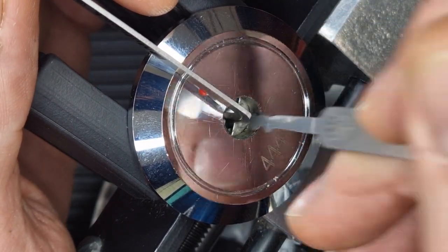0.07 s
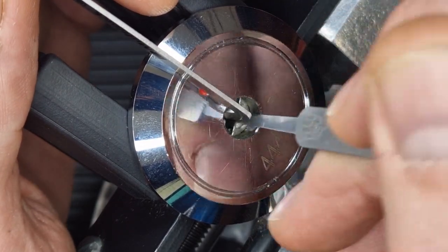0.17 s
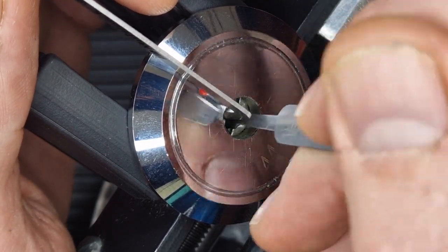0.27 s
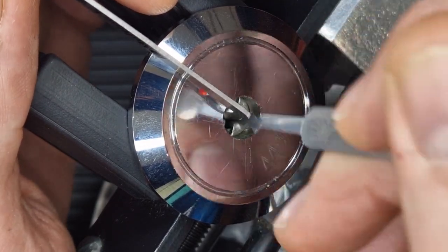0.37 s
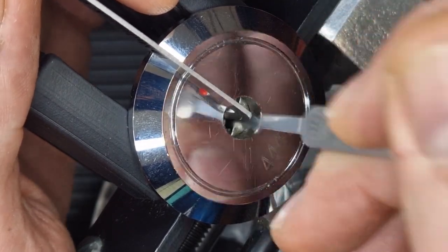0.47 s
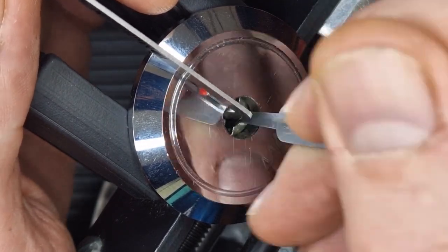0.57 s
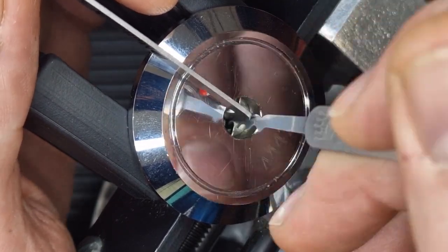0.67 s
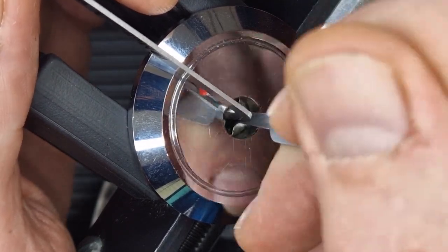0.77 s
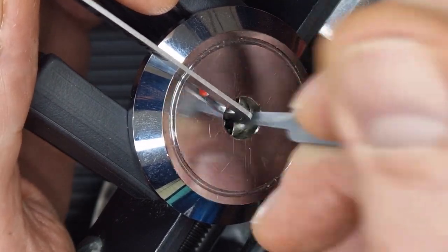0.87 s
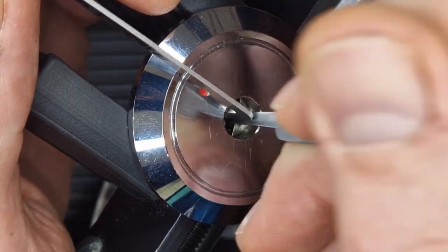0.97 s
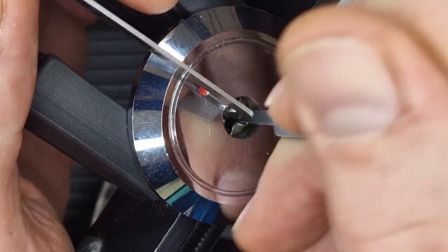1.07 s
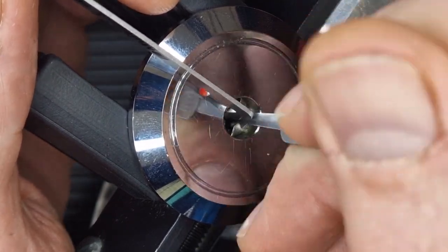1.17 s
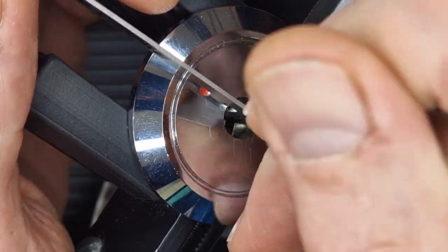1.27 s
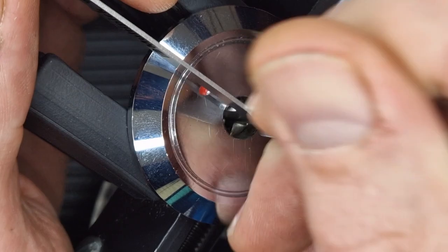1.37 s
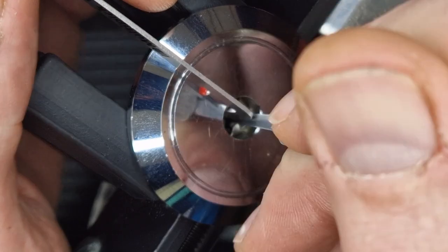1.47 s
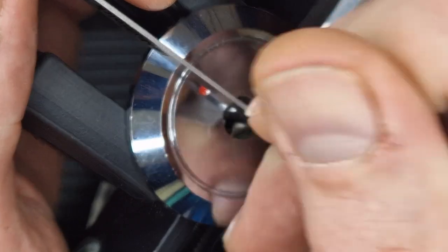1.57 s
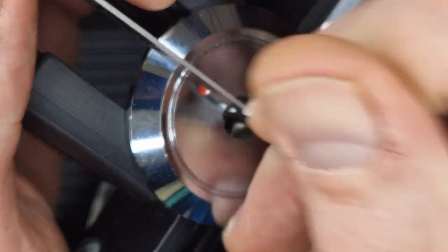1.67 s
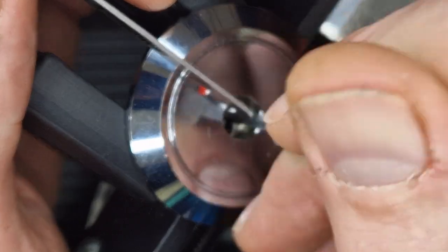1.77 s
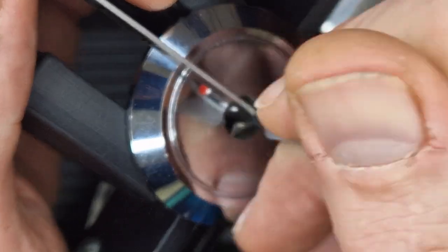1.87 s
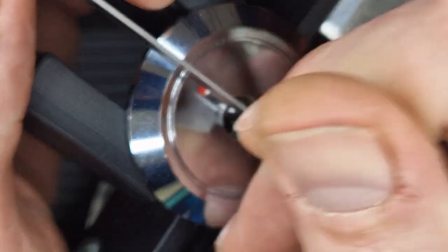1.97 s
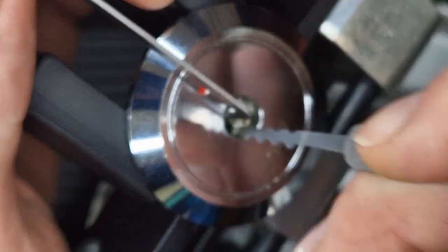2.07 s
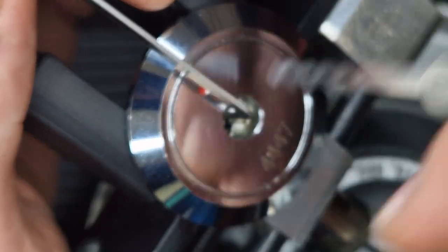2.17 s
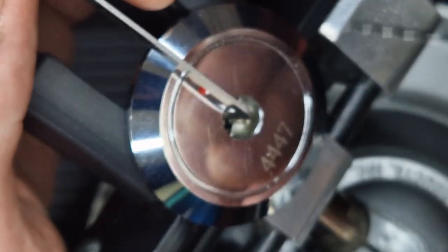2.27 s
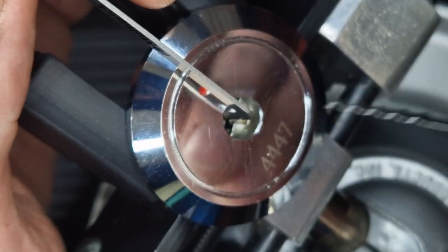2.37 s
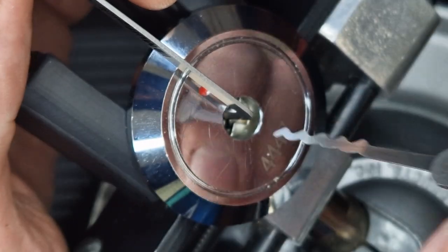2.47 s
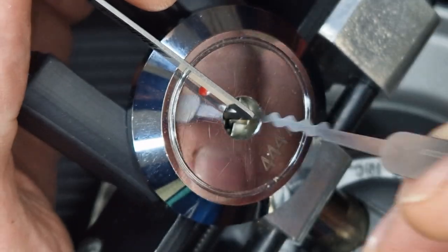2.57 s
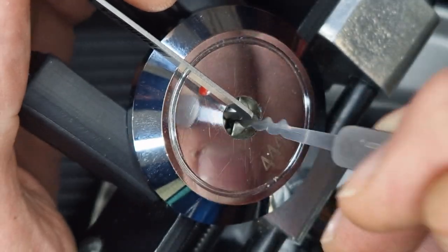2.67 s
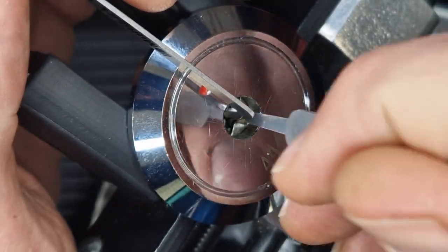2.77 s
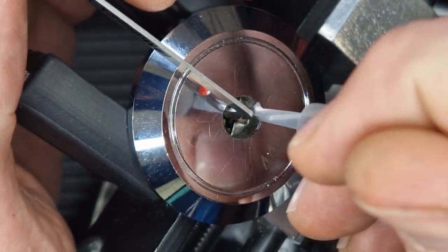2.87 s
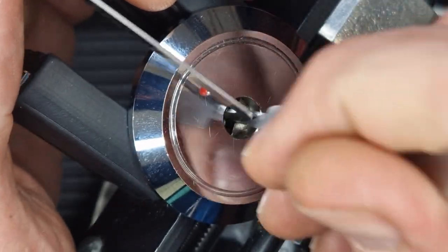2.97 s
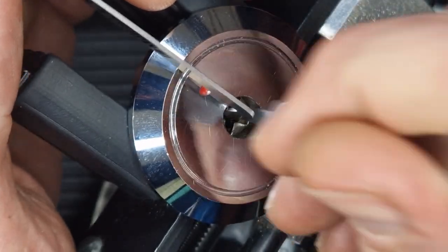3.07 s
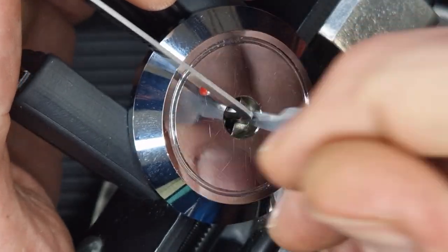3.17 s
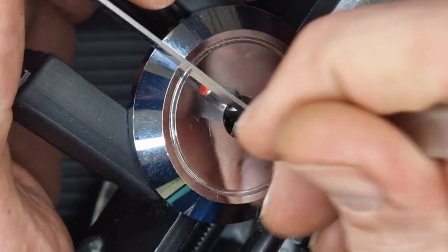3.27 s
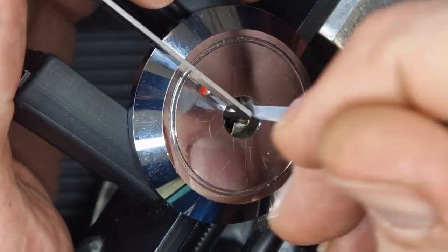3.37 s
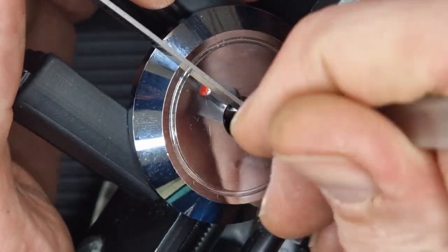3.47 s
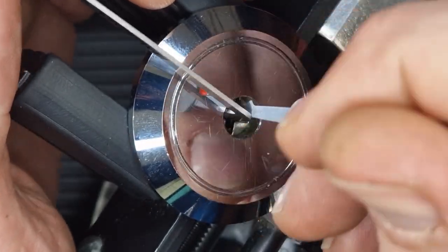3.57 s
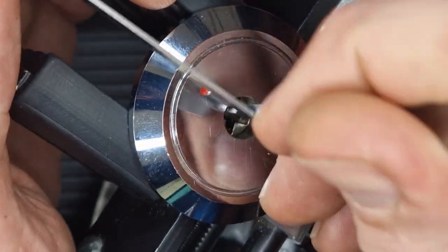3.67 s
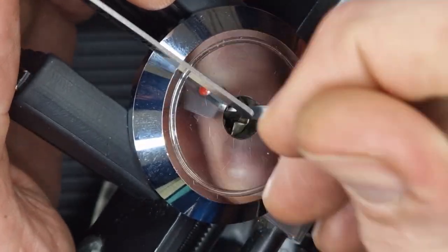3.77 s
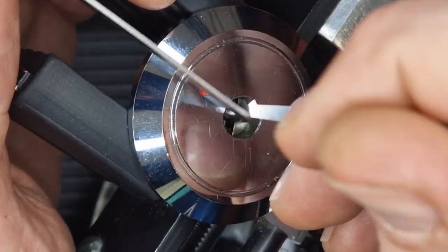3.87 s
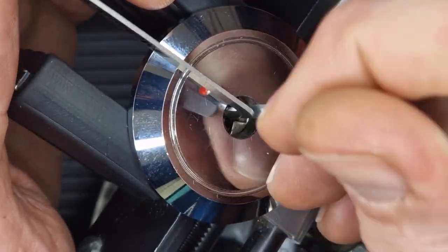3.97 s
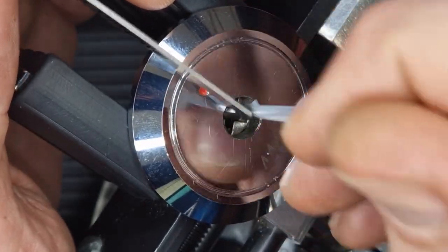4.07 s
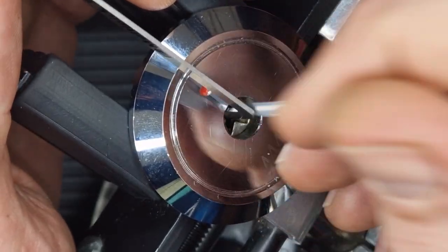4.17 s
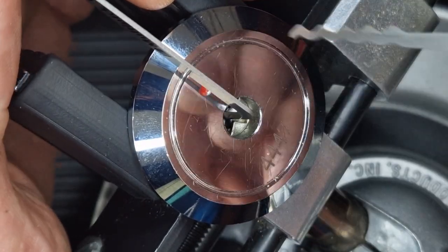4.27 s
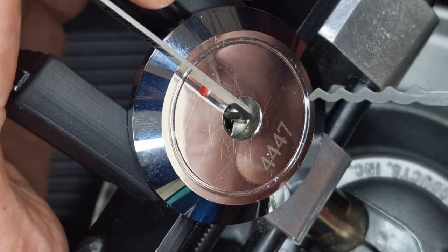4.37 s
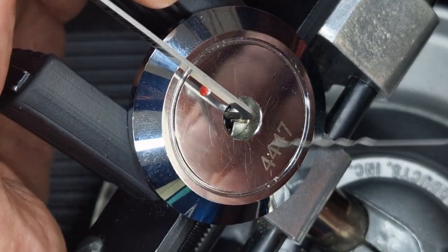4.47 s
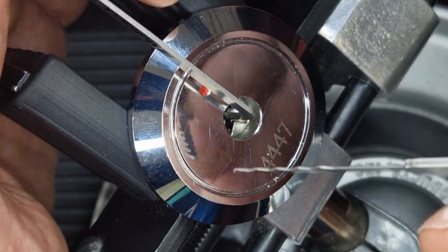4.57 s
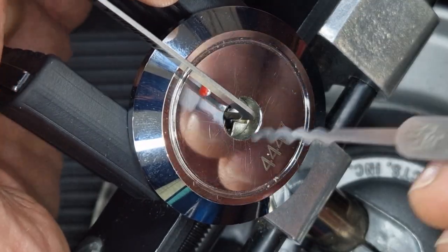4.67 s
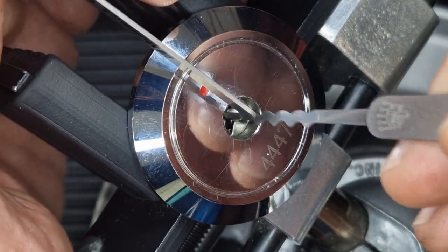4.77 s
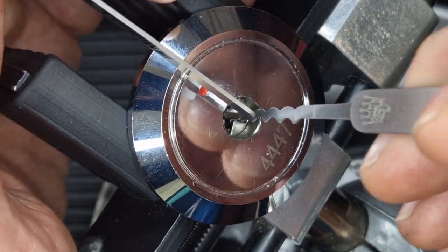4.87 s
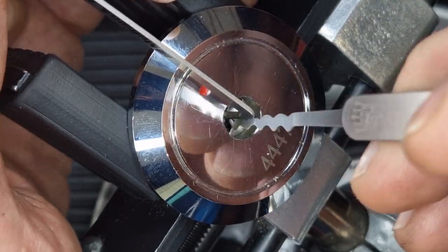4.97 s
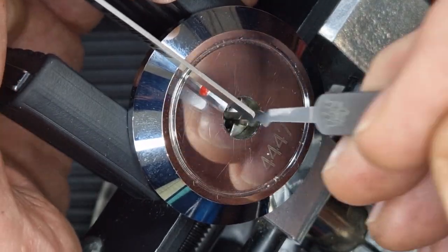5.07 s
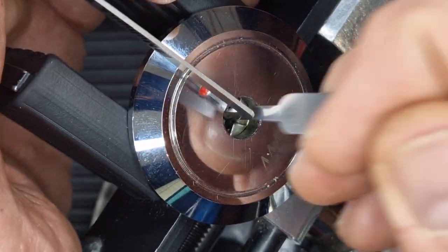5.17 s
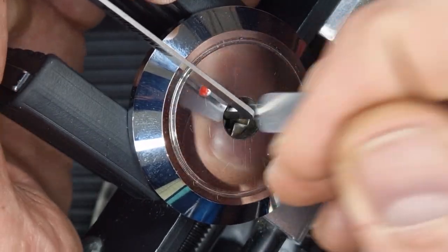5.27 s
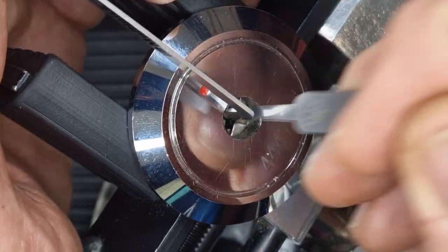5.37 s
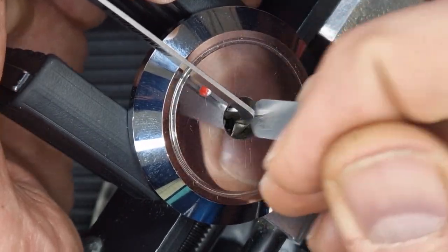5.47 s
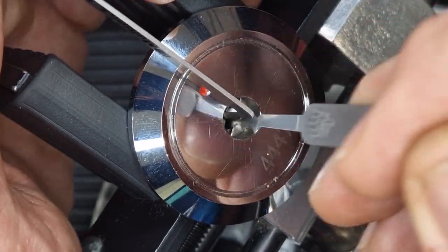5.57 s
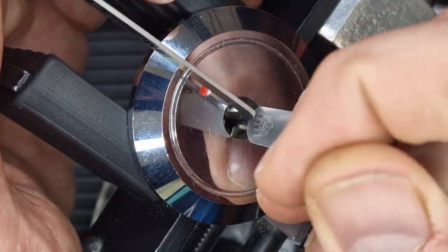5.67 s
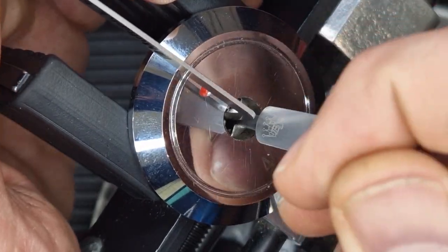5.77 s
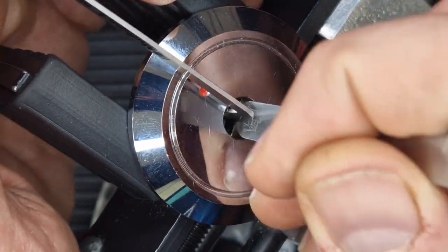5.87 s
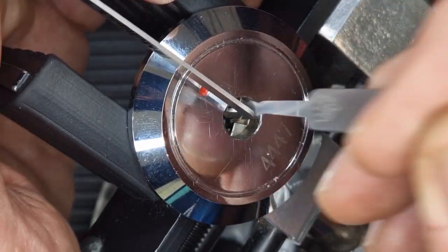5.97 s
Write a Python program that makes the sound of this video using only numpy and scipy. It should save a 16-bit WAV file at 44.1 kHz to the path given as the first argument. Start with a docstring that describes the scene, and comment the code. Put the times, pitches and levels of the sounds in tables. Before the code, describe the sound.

Very close, dry scraping of a thin toothed steel blade worked quickly back and forth in a small lock. Gritty crackles and bright sharp snaps come about twelve strokes a second, with small body knocks and dull bumps through the bench. The first burst is followed by a short pause, a second equally busy burst, another pause, then slower, lighter scraping. Small damped room, faint low room noise, wide stereo with the bright blade leaning left.

```python
"""A steel rake is scrubbed in and out of a small lock held in a vice, close to a phone on the same bench.
Each stroke is a dense crackle of teeth on pins with some loud snaps: shaped noise that rings sharp
resonances ("modes") of the blade, the pins, the lock body, its clamp and the vice.
Three rakes are used in turn, in a small damped room made of fading noise, over faint room noise."""
import sys
import numpy as np
from scipy import signal
from scipy.fft import rfft, irfft
from scipy.io import wavfile
from scipy.ndimage import uniform_filter1d

SR = 44100
rng = np.random.default_rng(int(sys.argv[2]) if len(sys.argv) > 2 else 0)


def to_wav(s):
    """Save 16-bit WAV."""
    ch = np.atleast_2d(s).T  # columns
    pcm = np.round(np.clip(ch, -1, 1) * 32767)  # PCM
    wavfile.write(sys.argv[1], SR, pcm.astype(np.int16))


N = 265570  # length of the scene in samples

# strokes in or out, levels relative: start_s, length_s, teeth_scrape_db, hand_push_db
STROKES = [(0.009, 0.074, -46.5, -40.5), (0.115, 0.066, -35, -49), (0.278, 0.065, -36, -38.5),
           (0.356, 0.049, -30.5, -38.5), (0.428, 0.046, -32, -34), (0.507, 0.062, -35.5, -41.5),
           (0.59, 0.064, -24, -28), (0.673, 0.073, -29.5, -37.5), (0.772, 0.032, -20, -26.5),
           (0.835, 0.092, -33, -46), (0.93, 0.04, -22.5, -30.5), (0.998, 0.084, -31, -42),
           (1.092, 0.059, -25.5, -31), (1.171, 0.063, -35.5, -43.5), (1.243, 0.057, -31, -28),
           (1.325, 0.072, -31.5, -39.5), (1.401, 0.056, -27.5, -28.5), (1.481, 0.062, -26, -38.5),
           (1.555, 0.056, -23.5, -31), (1.629, 0.056, -25, -39.5), (1.703, 0.056, -22, -34),
           (1.774, 0.052, -41, -37), (1.848, 0.041, -27.5, -32.5), (1.913, 0.027, -54, -42.5),
           (1.955, 0.12, -54.5, -45), (2.026, 0.11, -29, -41.5), (2.727, 0.14, -47, -50),
           (2.831, 0.11, -47, -47), (2.935, 0.072, -29.5, -37.5), (2.998, 0.096, -35, -40.5),
           (3.099, 0.079, -29, -37.5), (3.173, 0.099, -34.5, -38.5), (3.284, 0.067, -26, -33),
           (3.352, 0.067, -29.5, -37.5), (3.463, 0.088, -26.5, -35), (3.541, 0.071, -32, -38.5),
           (3.592, 0.048, -37.5, -42), (3.648, 0.033, -33, -32.5), (3.688, 0.027, -34, -32.5),
           (3.715, 0.067, -32.5, -36.5), (3.803, 0.042, -28, -33), (3.865, 0.1, -38.5, -38.5),
           (3.955, 0.087, -33, -34.5), (4.039, 0.055, -24, -36.5), (4.124, 0.062, -26, -32.5),
           (4.221, 0.068, -23, -37), (4.823, 0.017, -49, -48.5), (4.964, 0.069, -42.5, -52),
           (5.053, 0.06, -45, -39), (5.093, 0.085, -42.5, -49.5), (5.199, 0.11, -35.5, -35),
           (5.302, 0.097, -32.5, -37.5), (5.408, 0.1, -31.5, -33.5), (5.511, 0.11, -34, -39.5),
           (5.634, 0.12, -33, -33.5), (5.754, 0.015, -36.5, -42), (5.839, 0.019, -46.5, -45),
           (5.899, 0.03, -43, -40), (5.95, 0.083, -40.5, -58)]
# pins snapping over a tooth, tips touching the lock, levels relative: time_s, snap_db, lock_knock_db
SNAPS = [(0.035, -17.5, -36), (0.1458, -12, -26.5), (0.6085, -17, -23), (0.769, -12, -35), (0.789, -6, -36),
         (0.8762, -13, -26.5), (0.954, -2, -9.5), (1.0261, -13, -26), (1.1182, -6, -16), (1.122, -10, -14),
         (1.1363, -7, -33), (1.1781, -11.5, -23.5), (1.2527, -11, -19), (1.271, -5.5, -18),
         (1.2948, 1, -13), (1.423, -24, -28), (1.499, -15, -23), (1.569, -13, -40.5), (1.661, -5.5, -24),
         (1.744, 1.5, -11), (1.8029, -8, -20), (1.818, -7.5, -38), (1.859, -12.5, -39), (1.879, -8.5, -24),
         (1.9983, -12.5, -22), (2.05, -6, -27), (2.135, -21.5, -36.5), (2.1907, -25, -41),
         (2.6362, -29.5, -50), (2.6797, -32, -55.5), (2.72, -30, -46), (2.7688, -7, -28),
         (2.784, -5.5, -24), (2.9616, -17, -25), (2.978, -9, -32), (3.1091, -16, -20), (3.132, -7, -28),
         (3.142, -21, -30), (3.2042, -12.5, -54), (3.2449, -10.5, -27), (3.3087, -11, -36),
         (3.402, -13, -45), (3.4277, -7.5, -27.5), (3.4943, -3.5, -23), (3.5704, -12.5, -23.5),
         (3.6152, -6.5, -31), (3.6692, -20, -26), (3.7025, -3, -27), (3.7408, -6.5, -39), (3.7587, -7, -25),
         (3.8301, -3, -26), (3.9063, 1.5, -18), (3.9985, -9, -23.5), (4.006, 2, -26.5),
         (4.0576, -21, -43.5), (4.0728, -19, -24), (4.0907, -15, -42), (4.1502, -5, -34.5),
         (4.2337, -7.5, -16), (4.243, -4.5, -24.5), (4.27, -10.5, -32.5), (4.289, -25, -32.5),
         (4.7564, -39, -66), (4.835, -38, -34.5), (4.848, -41, -38), (4.989, 4, -22), (5.07, -18.5, -52),
         (5.1347, -10, -20.5), (5.191, -24, -29), (5.2037, -14, -30.5), (5.273, -9.5, -35),
         (5.5374, -21, -28), (5.5698, -8.5, -32), (5.669, -10.5, -33), (5.688, -15, -22),
         (5.769, -21.5, -24), (5.85, -42, -39), (5.9893, -19, -37), (6.0051, -18.5, -48)]


def rake():
    """Blade and pins: short bright modes whose balance changes with the rake in use."""
    # modes of each part: pitch_hz, width_hz, left_minus_right_db, rake_1_db, rake_2_db, rake_3_db
    blade_modes = [(8240, 1300, 14, -5, 1, -2.5), (9700, 590, 20, -4.5, -16, 4.5),
                   (10640, 450, 17, -2, -16.5, -4), (11480, 480, 44, -5.5, 6, -1),
                   (12240, 920, 13, 3, -3, -13), (13200, 910, 11, 1.5, 11, -0.5),
                   (14650, 900, 9, 9, -0.5, 0), (16700, 1200, 13, 13, 15.5, -7)]
    pin_modes = [(4380, 390, 6, -9, -5.5, -27), (5470, 690, 1.9, -3.5, -38, 5),
                 (6196, 230, 2.1, -14.5, 4, -2), (6710, 250, 4.9, -8.5, 2.5, 6), (7240, 250, 22, 0, 7, 2)]
    # pins against blade, in a scrape and in a snap: rake_1_db, rake_2_db, rake_3_db
    pins_scrape_db = (-15, -4.5, -8.5)
    pins_snap_db = (-16.5, -7.5, -15.5)

    ticks = crackle(180., spread_db=3.6, burst_s=.00055, hiss_db=-6.)
    scrape_db = np.array(STROKES)[:, 2]
    rub = effort(scrape_db, tail_s=0.0036) * ticks * pair((N,))
    parts = (
        (pin_modes, in_use(pins_snap_db), in_use(pins_scrape_db)),
        (blade_modes, 1, 1),
    )
    out = 0
    for modes, snap_gain, scrape_gain in parts:
        m = np.array(modes)
        blows = snap_gain * snaps(np.array(SNAPS)[:, 1], rise_s=0.0011, burst_s=0.0011)
        gains = [in_use(row) for row in m[:, 3:]]
        rows = ring(m[:, 0], m[:, 1], gains, blows, scrape_gain * rub)
        out = out + both(rows, m[:, 2], 90., place_db=3.3, aim_db=2.53)
    return band(out, 2600.0, .45 * SR)


def lock():
    """The lock body and the clamp that holds it take the heavier bumps of the teeth."""
    # modes of each part: pitch_hz, width_hz, level_db, left_minus_right_db
    body_modes = [(1058, 27, -7, 16), (1185, 64, -6, 2), (1482, 92, -12.5, -4), (1623, 102, 3.5, 0.5),
                  (2332, 55, -3.5, -2.5), (2513, 66, -2.5, 19.5), (2744, 186, 12, 25.5),
                  (3020, 260, -9.5, 19), (3510, 45, -9.5, 23)]
    clamp_modes = [(339, 23, -12.5, 9.5), (410, 51, 5, 3.5), (523, 43, 1.5, 3.5), (559, 200, -14.5, -0.5)]
    # lock body against vice under the same push: rake_1_db, rake_2_db, rake_3_db
    body_share_db = (2, 2, 0.5)
    # how strongly the clamp speaks: rake_1_db, rake_2_db, rake_3_db
    clamp_share_db = (-9, -7, -6.5)

    bumps = crackle(250., spread_db=2.77, burst_s=0.0014, hiss_db=-16.5) * rng.standard_normal(N)
    push_db = np.array(STROKES)[:, 3]
    body_rub = in_use(body_share_db) * effort(push_db, tail_s=0.0082, skew=0.92) * bumps
    clamp_rub = effort(push_db, tail_s=0.0092, skew=0.92) * bumps
    knocks = snaps(np.array(SNAPS)[:, 2], rise_s=0.0031, burst_s=0.0057)[0]

    m, c = np.array(body_modes), np.array(clamp_modes)
    body_rows = ring(m[:, 0], m[:, 1], undb(m[:, 2]), knocks, body_rub)
    body = both(body_rows, m[:, 3], 40., place_db=2.96, aim_db=1.76)
    clamp_rows = ring(c[:, 0], c[:, 1], undb(c[:, 2]), undb(-9.0) * knocks, clamp_rub)
    clamp = both(clamp_rows, c[:, 3], 30., place_db=3.0, aim_db=0.72)
    return band(body, 1164.0, 8100.0, order=3) + in_use(clamp_share_db) * band(clamp, 308.0, 660.0)


def vice():
    """The push of the hand shakes vice and bench; it reaches the phone through the wood."""
    # modes: pitch_hz, width_hz, level_db, left_minus_right_db
    vice_modes = [(63, 15, -5, -3.5), (84, 11, -1.5, -1.5), (104.4, 36, 5.5, 5), (135, 11.8, -6, 4.5),
                  (185, 20, -9, 2)]
    # how strongly the vice speaks: rake_1_db, rake_2_db, rake_3_db
    vice_share_db = (-0.5, 1.5, -2.5)

    m = np.array(vice_modes)
    shaking = crackle(150., spread_db=2., burst_s=0.0014, hiss_db=-1.0) * rng.standard_normal(N)
    push = effort(np.array(STROKES)[:, 3], tail_s=0.02)
    rub = in_use(vice_share_db) * push * shaking
    rows = ring(m[:, 0], m[:, 1], undb(m[:, 2]), 0, rub)
    return band(both(rows, m[:, 3], 9.5, place_db=0.59, aim_db=2.5), 54.0, 260.0)


def effort(db, tail_s, skew=0.88, drag_db=-23.0, drag_s=.14):
    """Each stroke swells and fades as the blade speeds up and stops; near strokes it still drags lightly."""
    out = np.zeros(N)
    for (s, length, *_), gain in zip(STROKES, undb(db)):
        i = np.arange(max(int(s * SR), 0), min(int((s + length) * SR), N))
        progress = np.clip((i / SR - s) / length, 0, 1)
        out[i] += gain * np.sin(np.pi * progress ** skew) ** 1.95
    keep = np.exp(-1 / (tail_s * SR))
    power = signal.lfilter([1 - keep], [1, -keep], out ** 2)
    drag = undb(2 * drag_db) * uniform_filter1d(out ** 2, int(drag_s * SR))  # doubled dB: this is power
    return np.sqrt(power + np.maximum(drag, 0))


def crackle(per_s, spread_db, burst_s, hiss_db, uneven=.6):
    """Envelope of unequal slips at loosely even gaps, each swelling and dying, over friction hiss; rms 1."""
    gap, size = rng.random(N // 20), rng.exponential(size=N // 20)
    gap_samples = SR / per_s * (1 + np.clip(uneven, 0, .95) * (2 * gap - 1))
    at = np.cumsum(gap_samples).astype(int)
    heights = undb(spread_db * np.minimum(size, 3))
    slips = np.bincount(at[at < N], heights[at < N], N)
    keep = np.exp(-1 / (burst_s * SR))
    bursts = signal.lfilter([1], [1, -2 * keep, keep ** 2], slips)
    return unit(unit(bursts) + undb(hiss_db))


def snaps(db, rise_s, burst_s):
    """Each snap is a rattle of contacts that builds up briefly and dies; its level sets the energy."""
    before = 150  # samples of build-up ahead of the snap time
    t = (np.arange(500) - before) / SR
    shape = pair((len(SNAPS), len(t))) * np.exp(np.minimum(t / rise_s, -t / burst_s))
    shape *= undb(db)[:, None] / np.linalg.norm(shape, axis=2, keepdims=True)
    out = np.zeros((2, N + len(t)))
    for k, (s, *_) in enumerate(SNAPS):
        out[:, int(s * SR):int(s * SR) + len(t)] += shape[:, k]
    return out[:, before:N + before]


def ring(hz, width_hz, gains, blows, rub):
    """One row per mode, wider modes dying faster; blows set the summed peak, rubbing the summed rms."""
    decay = np.exp(-np.pi * width_hz / SR)
    angle = 2 * np.pi * hz / SR
    force = blows / np.sqrt(sum(g ** 2 for g in gains))
    force = force + rub / np.sqrt(sum(g ** 2 / (2 - 2 * q * q) for g, q in zip(gains, decay)))
    rows = []
    for q, a, g in zip(decay, angle, gains):
        rows.append(signal.lfilter([0, q * np.sin(a)], [1, -2 * q * np.cos(a), q * q], g * force))
    return rows


def both(modes, pan_db, per_s, place_db, aim_db):
    """Left and right sums: the contact favours modes from pin to pin, the moving hand screens each port."""
    out = np.zeros((2, N))
    for m, p in zip(modes, pan_db):
        place = wander(per_s, place_db)
        left = wander(per_s, aim_db)
        right = wander(per_s, aim_db) * undb(-p)
        out += m * place * [left, right]
    return out


def pair(shape):
    """Noise for the two ports: they face different parts of the steel, so only a share is common."""
    common, own = rng.standard_normal((2,) + shape)
    alike = 0.37  # share that both ports hear alike, 0 to 1
    return np.array([common, alike * common + np.sqrt(1 - alike ** 2) * own])


def in_use(db):
    """Gain over time from one dB value for each rake."""
    # when the second and third rake take over: second_rake_s, third_rake_s
    rake_change_s = (2.4, 4.6)
    return undb(db)[np.searchsorted(rake_change_s, np.arange(N) / SR)]


def room(x):
    """The room's echoes: octave bands of decaying noise, unrelated at the two ports."""
    # time to fade by 60 dB: pitch_hz, fade_s
    room_fade = [(200, 0.46), (1000, 0.11), (4000, 0.11), (12000, 0.06)]
    room_db = -15.5  # whole tail against the direct sound
    t = np.arange(int(.35 * SR)) / SR
    hz, t60 = np.transpose(room_fade)
    tail = 0
    for f in 250 * 2 ** np.arange(7.):
        fade_s = np.interp(np.log(f), np.log(hz), t60)
        fade = undb(-60 * t / fade_s) * np.clip(t / 0.0054, 0, 1)  # the echoes build up over 5.4 ms
        noise = rng.standard_normal((2, len(t)))
        tail = tail + fade * band(noise, f / np.sqrt(2), f * np.sqrt(2))
    tail *= undb(room_db) / np.sqrt(np.sum(tail ** 2) / 2)
    return signal.fftconvolve(x[None], tail, axes=1)[:, :N]


def air():
    """Room noise, more alike at both ports in the bass and 9 dB stronger on the left."""
    # colour of the noise, relative level per Hz: pitch_hz, level_db
    air_colour = [(15, -30), (25, 0), (89, -5), (223, -20), (1150, -27), (1550, -26), (7410, -36),
                  (9500, -54), (12400, -84), (20900, -120)]
    air_db = -66  # rms of the mean of both ports
    f = np.fft.rfftfreq(N, 1 / SR) + 1
    hz, db = np.transpose(air_colour)
    mid, side = rfft(rng.standard_normal((2, N)))
    apart = np.clip(f / 330.0, .3, 1)
    left = (mid + apart * side) * undb(6.5)
    right = (mid - apart * side) * undb(-2.5)
    colour = undb(np.interp(np.log(f), np.log(hz), db))
    noise = irfft(np.array([left, right]) * colour, N)
    return undb(air_db) * noise / np.std(noise.mean(axis=0))


def wander(per_s, spread_db):
    """A gain that drifts at random."""
    k = int(SR / per_s)
    steps = np.repeat(rng.standard_normal(N // k + 1), k)
    drift = uniform_filter1d(steps, k)[:N]
    return undb(spread_db * 1.31 * drift)  # 1.31 makes up for the spread lost in smoothing


def undb(db):
    """Turn decibels into a plain gain."""
    return 10 ** (np.asarray(db, float) / 20)


def unit(x):
    """Scale to an rms level of 1."""
    return x / np.sqrt(np.mean(x ** 2))


def band(x, lo_hz, hi_hz, order=2):
    """Keep only the pitches between two limits."""
    sos = signal.butter(order, [lo_hz, min(hi_hz, .45 * SR)], "band", fs=SR, output="sos")
    return signal.sosfilt(sos, x)


def scene():
    """Rake, lock and vice reach the right port slightly late; room echoes and room noise are added."""
    steel = rake() + lock()
    near = steel + vice()
    right_lag_s = .000115
    lag = int(round(right_lag_s * SR))
    near[1] = np.concatenate([np.zeros(lag), near[1, :N - lag]])
    return near + room(steel[0]) + air()


def record(dry):
    """The phone rounds the very loudest snaps and cuts the top."""
    top_hz = 15830
    rounded = np.tanh(1.25 * dry) / 1.25
    return signal.sosfilt(signal.ellip(12, .3, 85, top_hz, fs=SR, output="sos"), rounded)


dry = scene()
out = record(dry)
to_wav(out)
```